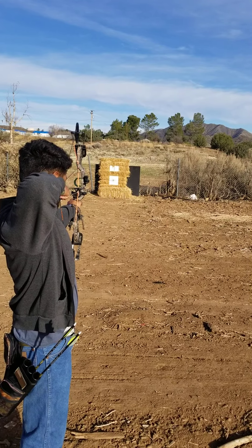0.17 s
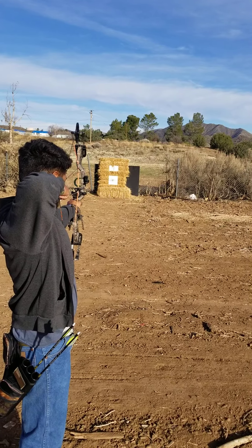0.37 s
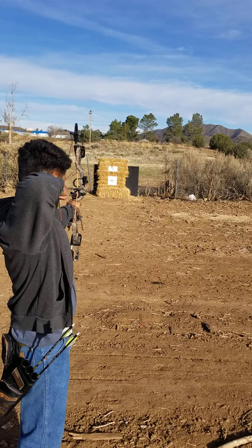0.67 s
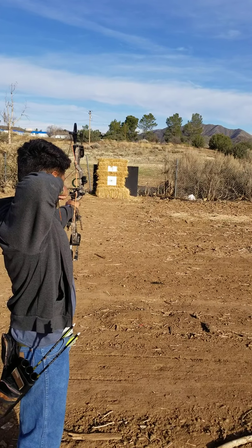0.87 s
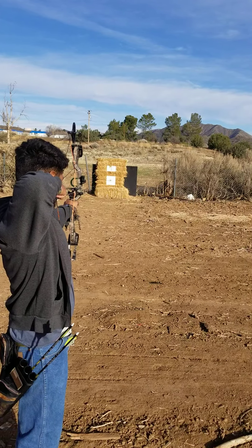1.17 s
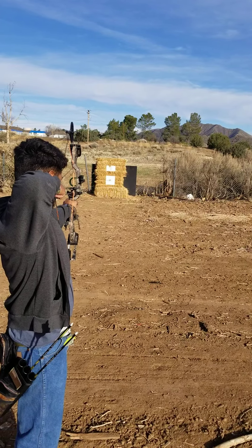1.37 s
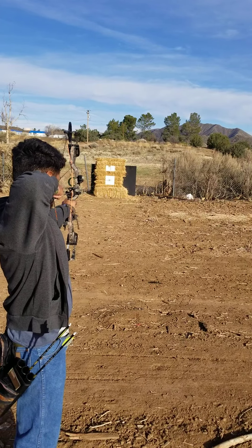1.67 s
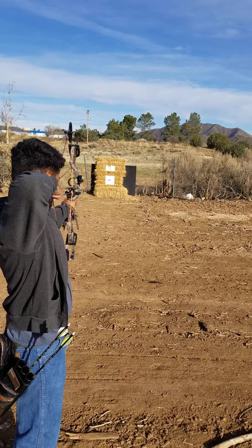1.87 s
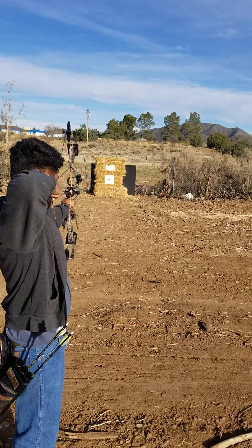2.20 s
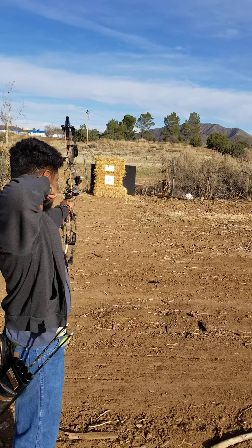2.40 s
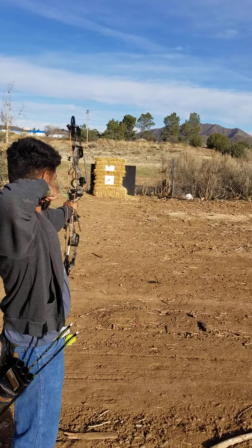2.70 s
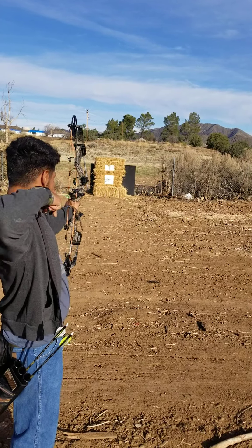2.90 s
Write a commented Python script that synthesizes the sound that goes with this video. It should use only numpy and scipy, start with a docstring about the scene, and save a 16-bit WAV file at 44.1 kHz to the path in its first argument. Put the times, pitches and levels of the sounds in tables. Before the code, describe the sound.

A compound bow shot, close and outdoors. Until 2.3 s, wind rumbles and puffs unevenly on the stereo microphone, often leaning left, over a dull distant wash, faint drone and hiss. At 2.32 s a tiny release click and rush lead to a hard snap at 2.35 s, with short rattle, metallic ring and open-field scatter. At 2.57 s the arrow knocks, crunches and thumps into straw; wind continues to about 3 s.

```python
"""Open dirt range: a compound bow is shot a step from the microphone and the arrow hits a hay bale.
The release clicks, the string rushes and slaps home: hard impulses and coloured noise bursts.
The bow rattles and rings as grainy noise and decaying modes; the bale answers with a low thump.
Wind buffets the two microphone ports as low noise and short pressure swings. Behind lie a dull wash,
a drifting hush, a faint drone and microphone hiss, all shaped noise."""
import sys
import numpy as np
from scipy import signal
from scipy.fft import rfft, irfft
from scipy.io import wavfile
from scipy.ndimage import map_coordinates

SR = 44100
rng = np.random.default_rng(int(sys.argv[2]) if len(sys.argv) > 2 else 0)


def pcm_store(signal):
    """Save signal as 16-bit PCM."""
    levels = np.round(np.clip(np.atleast_2d(signal), -1, 1) * 32767)
    wavfile.write(sys.argv[1], SR, levels.astype(np.int16).T)


N = 134505
T = np.arange(N) / SR
BIN_HZ = np.fft.rfftfreq(N, 1 / SR)

# How each port colours sound from ahead: pitch_hz [Hz], left_minus_right_db [dB]
PORT_BALANCE = [(200, 1.5), (600, -8.5), (1100, -6.5), (2000, -0.5), (3500, -9), (5000, -13), (7000, -25),
                (9000, -3), (12000, 2.5), (15000, 8.5)]
AHEAD_LIKENESS = 0.72  # power share common to both ports

# Dull far-off wash, colour: pitch_hz [Hz], gain_db [dB]
WASH_COLOUR = [(100, -8.5), (270, -3), (380, -2), (480, -4.5), (620, -3.5), (850, -3.5), (1100, -14.5),
               (1500, -31), (2700, -38.5), (5000, -47.5)]
# Its slow swell: time_s [s], level_db [dB]
WASH_SWELL = [(0, -58), (.5, -60.5), (1.0, -59.5), (1.4, -59.5), (1.7, -60.5), (2.2, -60), (2.8, -57.5),
              (3.05, -59)]
WASH_LIKENESS, WASH_PAN_DB = 0.68, -4.6  # negative pan leans right
# Far-off hush on the right, swelling and drifting: time_s [s], level_db [dB], pitch_ratio [x]
HUSH_DRIFT = [(0, -61.5, 0.94), (.12, -62.5, 0.96), (.32, -67, 1.036), (.55, -66, 0.92), (.85, -67.5, 0.98),
              (1.05, -65, 1), (1.22, -63, 1.094), (1.4, -61.5, 0.96), (1.7, -70, .98), (1.95, -67, 1),
              (2.25, -68.5, 1.004), (2.8, -69.5, 1.13), (3.05, -67.5, .93)]
# Hush colour before the drift: pitch_hz [Hz], gain_db [dB]
HUSH_COLOUR = [(600, -19.5), (950, 0), (1200, -0.5), (1400, -1), (1680, -1), (1900, -10), (2150, -16),
               (2600, -37), (4000, -47)]
HUSH_PAN_DB = -19.5
# Microphone hiss, colour: pitch_hz [Hz], gain_db [dB]
HISS_COLOUR = [(2000, 0), (4000, -0.5), (7000, -3.5), (9500, -3), (12000, -0.5), (15500, -1.5)]
HISS_DB = -75
# Narrow band of the far-off drone: pitch_hz [Hz], gain_db [dB]
DRONE_COLOUR = [(250, -80), (335, -29.5), (372, -1), (385, 3.5), (398, 0.5), (445, -30), (600, -80)]
DRONE_DB, DRONE_PEAK_S, DRONE_SPREAD_S = -65, 0.87, 0.48

# Gusts at the ports: time_s [s], level_db [dB, before the lift below]
GUST_LEVEL = [(0, -44.5), (.34, -47.5), (.52, -51), (.75, -49), (1.0, -48.5), (1.09, -42.5), (1.22, -42),
              (1.4, -34), (1.5, -40.5), (1.6, -46.5), (1.7, -43.5), (1.77, -47.5), (1.82, -36.5),
              (2.01, -36.5), (2.05, -47.5), (2.14, -48), (2.26, -45.5), (2.5, -47.5), (2.72, -44.5),
              (2.78, -36.5), (2.84, -39.5), (2.98, -48), (3.05, -44.5)]
# Side of the gusts: time_s [s], left_minus_right_db [dB]
GUST_PAN = [(0.0, 23), (0.04, 7), (0.47, 6.5), (0.5, 1), (1.77, 2), (1.83, 21), (1.91, 5), (3.03, 8),
            (3.05, 13)]
# Rumble colour of the gusts: pitch_hz [Hz], gain_db [dB]
GUST_COLOUR = [(20, -16), (45, -3), (70, -2.5), (97, 0.5), (160, -5), (240, -13.5), (330, -24), (450, -31),
               (800, -51), (2000, -79)]
GUST_LIFT_DB, GUST_LIKENESS = 1.5, 0.27
# Single eddies: centre_s [s], level_db [dB], pitch_hz [Hz], left_minus_right_db [dB]
EDDIES = [(0.133, -35.5, 59, 14), (.386, -25.5, 92, 27), (.466, -32, 103, 22), (.70, -32, 104, 14),
          (1.131, -26.5, 151.4, 18), (1.449, -25.5, 83.7, 10), (1.827, -24.5, 86, 23),
          (1.956, -27.5, 109, 5)]
EDDY_SPREAD_CYCLES, EDDY_OCTAVE_DB = 0.66, -13.5  # the octave steepens each swing

# Faint high pings after the hit: start_s [s], level_db [dB]
PINGS = [(2.641, -72), (2.676, -76)]
PING_HZ, PING_T60_S = 6270, 0.085

# Arrow piercing target face and straw: start_s [s], level_db [dB], t60_s [s]
PIERCE_BURSTS = [(2.5725, -33, 0.014), (2.5741, -41.5, 0.027), (2.581, -55.5, 0.087)]
# Straw colour: pitch_hz [Hz], gain_db [dB]
STRAW_COLOUR = [(290, -12), (500, -9), (1100, 3), (1600, -16), (2100, -4.5), (2810, -2.5), (4280, -18.5),
                (5880, -10), (7200, -25), (9500, -25.5), (10800, -16), (16000, -29)]
KNOCK_DB = 11.5  # relative to the first pierce burst
STRAW_TAIL_DB, STRAW_TAIL_T60_S = -58, 0.26
# Body modes of the bale: pitch_hz [Hz], level_db [dB], t60_s [s]
BALE_MODES = [(118, -10.5, 0.035), (250, -17, 0.023), (372, -21, 0.023)]
THUMP_S, THUMP_PUSH_S = 2.5828, 0.0043  # start and linear fade-in
DRAG_S, DRAG_HZ, DRAG_DB, DRAG_T60_S = 2.576, 221, -23.5, 0.041

# Release click and rush, colour: pitch_hz [Hz], gain_db [dB]
RELEASE_COLOUR = [(1180, -46), (2000, -6), (3940, -14), (4610, -5), (8330, -15), (11400, -3), (16000, -5.5)]
RELEASE_S, RELEASE_DB, RELEASE_T60_S = 2.3245, -49, 0.022
CLICK_DB = 11  # relative to the release burst
RUSH_DB, RUSH_RISE_S = -34.5, 0.024  # level at the stop, time of a 60 dB rise
SLIDE_DB = -58.5  # the arrow slides over its rest
# Blows in the bow: a first blow, the string stop (second row), then cams and fittings: start_s [s], level_db
# [dB], t60_s [s], left_minus_right_db [dB]
BLOWS = [(2.3493, -23, 0.014, 3.5), (2.35, -20, .02, -3), (2.3537, -29, 0.02, -1),
         (2.3574, -38.5, 0.016, 7), (2.3677, -30, .011, 13)]
STOP_S = BLOWS[1][0]
# Colour of the struck bow: pitch_hz [Hz], gain_db [dB]
BOW_COLOUR = [(150, -28.5), (300, -2), (500, -11.5), (750, -8.5), (1150, -5.5), (1380, -20), (1900, -12.5),
              (2650, -5), (3500, -15), (4600, -11.5), (5900, -8), (8300, -18), (11100, -8.5),
              (12500, -12.5), (15300, -11), (18000, -30.5)]
CRACK_DB = 11.5  # relative to the burst of the same blow
BOW_LAG_S = -0.000062  # the right port hears the bow a little earlier
RATTLE_DB, RATTLE_HOLD_S, RATTLE_T60_S = -34, 0.026, 0.045
RATTLE_GRAIN_DB, RATTLE_LIKENESS = 4, 0.6  # grain: standard deviation of level
# Ringing bow: pitch_hz [Hz], level_db [dB, relative to RING_DB], t60_s [s]
BOW_MODES = [(1240, 0, 0.13), (1562, -5.5, 0.13), (2770, -2.5, 0.16), (3300, -3.5, 0.16),
             (3740, -15.5, 0.13), (4054, -21, 0.14), (4940, -2, 0.081), (5700, -6, 0.085),
             (6928, -5.5, 0.065), (7360, -7.5, 0.13), (7470, -6.5, 0.069), (7833, -18.5, 0.1)]
RING_DB = -42
# String and limbs: pitch_hz [Hz], level_db [dB], t60_s [s]
LIMB_MODES = [(100, -43.5, .2), (158, -44, 0.35), (235, -28.5, .095), (363.5, -30.5, 0.071),
              (543, -40, 0.053), (690.5, -35, 0.096), (880, -32.5, .035), (1139, -29.5, .04)]
LIMB_DELAY_S, LIMB_LAG_S = 0.00094, 0.00005  # the limbs take up the shock late; right port lags
# Scatter from ground and scrub, colour: pitch_hz [Hz], gain_db [dB]
FIELD_COLOUR = [(200, 0), (800, 6), (1400, -4.5), (2700, -3), (4200, -12.5), (6000, -12.5), (8200, -17),
                (11000, -11.5), (16000, -14)]
GROUND_DB, GROUND_T60_S = -41.5, 0.25
SCRUB_DB, SCRUB_T60_S = -58, 0.59

TOP_HZ = 16000


def amp(db):
    """Decibels to amplitude."""
    return 10 ** (np.asarray(db) / 20)


def curve(rows):
    """Straight lines through (time_s, value) rows."""
    return np.interp(T, *np.array(rows).T)


def shape(points):
    """Gain per frequency bin, drawn in dB over log frequency."""
    hz, db = np.array(points).T
    return amp(np.interp(np.log(BIN_HZ + 1), np.log(hz), db))


def pan(db):
    """Left and right gains of constant power; positive leans left."""
    gains = amp(np.array([db, -db]) / 2).reshape(2, -1)
    return gains / np.sqrt(np.mean(gains ** 2, axis=0))


def port_gains():
    """Left and right gain per frequency bin for sound from ahead."""
    return pan(20 * np.log10(shape(PORT_BALANCE)))


def noise(colour, likeness, ahead=False, lag=0):
    """Coloured stereo noise of rms 1, partly shared between the ports; the right may lag."""
    common_share = np.clip(likeness, 0, 1)
    white = rng.standard_normal((3, N))
    stereo = np.sqrt(common_share) * white[0] + np.sqrt(1 - common_share) * white[1:]
    spectrum = rfft(stereo) * shape(colour)
    spectrum[1] *= np.exp(-2j * np.pi * BIN_HZ * lag)
    if ahead:
        spectrum = spectrum * port_gains()
    sound = irfft(spectrum, N)
    return sound / sound.std()


def fall(start, t60, hold=0):
    """Sudden start, hold, then exponential decay of 60 dB per t60."""
    return (T >= start) * np.exp(-np.log(1000) * np.maximum(T - start - hold, 0) / t60)


def ring(start, modes, lag=0):
    """Decaying sine modes struck together, balanced by the ports at each pitch."""
    port_hz, port_db = np.array(PORT_BALANCE).T
    at = start + np.array([[0], [lag]])
    total = 0
    for hz, db, t60 in modes:
        side = pan(np.interp(hz, port_hz, port_db))
        total = total + side * amp(db) * fall(at, t60) * np.sin(2 * np.pi * hz * (T - at))
    return total


def contact(rows, colour, lag=0):
    """Hard impulses (start_s, level_db, left_minus_right_db) through a causal colour."""
    gain = shape(colour) * port_gains()
    # Folding the cepstrum forward gives minimum phase: no sound precedes the impulse.
    cepstrum = irfft(np.log(gain / np.sqrt(np.mean(gain ** 2))), N)
    causal = np.exp(rfft(cepstrum * (1 + np.sign(np.fft.fftfreq(N)))))
    late = np.array([[0], [lag]])
    impulses = 0
    for s, db, side in rows:
        at = np.round((s + late) * SR) / SR
        impulses = impulses + amp(db) * pan(side) * np.exp(-2j * np.pi * BIN_HZ * at)
    return irfft(causal * impulses, N)


def distant_wash():
    """A dull far-off wash: low noise with a slow swell."""
    return amp(curve(WASH_SWELL)) * pan(WASH_PAN_DB) * noise(WASH_COLOUR, WASH_LIKENESS)


def drifting_hush():
    """Band noise read at a varying speed, so its pitch drifts as it swells."""
    drift = np.array(HUSH_DRIFT)
    place = np.cumsum(curve(drift[:, [0, 2]]))  # read position in samples
    steady = noise(HUSH_COLOUR, WASH_LIKENESS)
    hush = np.array([map_coordinates(side, [place], order=3, mode="wrap") for side in steady])
    return amp(curve(drift[:, :2])) * pan(HUSH_PAN_DB) * hush


def microphone_hiss():
    """Steady faint treble noise, nearly independent in the two ports."""
    return amp(HISS_DB) * noise(HISS_COLOUR, 0.028)


def drone():
    """Narrow-band noise wavers like a far-off drone, swelling and fading."""
    swell = np.exp(-0.5 * ((T - DRONE_PEAK_S) / DRONE_SPREAD_S) ** 2)
    return amp(DRONE_DB) * swell * noise(DRONE_COLOUR, WASH_LIKENESS)


def gusts():
    """Turbulence rumbles on the ports as low noise, mostly separate in each."""
    level = amp(curve(GUST_LEVEL) + GUST_LIFT_DB)
    return level * pan(curve(GUST_PAN)) * noise(GUST_COLOUR, GUST_LIKENESS)


def eddies():
    """Single eddies puff against the ports: short pressure swings under a bell curve."""
    total = 0
    for (s, db, hz, side), turn in zip(EDDIES, rng.random(len(EDDIES))):
        cycles = (T - s) * hz
        phase = 2 * np.pi * (cycles + turn)
        swing = np.sin(phase) + amp(EDDY_OCTAVE_DB) * np.sin(2 * phase)
        bell = np.exp(-0.5 * (cycles / EDDY_SPREAD_CYCLES) ** 2)
        total = total + amp(db) * pan(side) * bell * swing
    return total


def pings():
    """Two faint high pings, each one decaying sine."""
    return sum(ring(s, [(PING_HZ, db, PING_T60_S)]) for s, db in PINGS)


def arrow_in_straw():
    """A knock on the target face, then straw crunches as decaying noise with a soft tail."""
    hit_s, hit_db = PIERCE_BURSTS[0][:2]
    knock = contact([(hit_s, hit_db + KNOCK_DB, 0)], STRAW_COLOUR)
    bursts = sum(amp(db) * fall(s, t60) for s, db, t60 in PIERCE_BURSTS)
    crunch = bursts * noise(STRAW_COLOUR, AHEAD_LIKENESS, ahead=True)
    tail = amp(STRAW_TAIL_DB) * fall(hit_s, STRAW_TAIL_T60_S) * noise(STRAW_COLOUR, 0.24)
    return knock + crunch + tail


def bale_thump():
    """The bale gives as it grips the shaft, and its low body modes thump."""
    push = np.clip((T - THUMP_S) / THUMP_PUSH_S, 0, 1)
    thump = ring(THUMP_S, BALE_MODES) * push
    drag = ring(DRAG_S, [(DRAG_HZ, DRAG_DB, DRAG_T60_S)])
    return thump + drag


def field_scatter():
    """Ground and scrub scatter the shot back as two decays of diffuse noise."""
    ground = amp(GROUND_DB) * fall(STOP_S, GROUND_T60_S)
    scrub = amp(SCRUB_DB) * fall(STOP_S, SCRUB_T60_S)
    return (ground + scrub) * noise(FIELD_COLOUR, 0.22)


def release_and_rush():
    """The release clicks; noise grows as string and arrow gather speed, until the stop."""
    burst = amp(RELEASE_DB) * fall(RELEASE_S, RELEASE_T60_S)
    rise = np.exp(-np.log(1000) * abs(STOP_S - T) / RUSH_RISE_S)
    travelling = (T > RELEASE_S) * (T < STOP_S)
    rush = travelling * (amp(SLIDE_DB) + amp(RUSH_DB) * rise)
    launch = (burst + rush) * noise(RELEASE_COLOUR, AHEAD_LIKENESS, True, BOW_LAG_S)
    click = contact([(RELEASE_S, RELEASE_DB + CLICK_DB, 0)], RELEASE_COLOUR, BOW_LAG_S)
    return launch + click


def bow_rattle():
    """Loose parts chatter: noise whose level jumps at random every 32 samples."""
    steps = np.repeat(rng.standard_normal(N // 32 + 1), 32)[:N]
    grain = amp(RATTLE_GRAIN_DB * steps)
    level = amp(RATTLE_DB) * fall(STOP_S, RATTLE_T60_S, RATTLE_HOLD_S)
    return level * grain * noise(BOW_COLOUR, RATTLE_LIKENESS, True, BOW_LAG_S)


def bow_ring():
    """The shock sets the bow ringing, then string and limbs, as decaying modes."""
    bow = amp(RING_DB) * ring(STOP_S, BOW_MODES, BOW_LAG_S)
    limbs = ring(STOP_S + LIMB_DELAY_S, LIMB_MODES, LIMB_LAG_S)
    return bow + limbs


def string_slap():
    """String stop, cams and fittings are struck: each a hard crack and a noise burst."""
    levels = sum(amp(db) * pan(side) * fall(s, t60) for s, db, t60, side in BLOWS)
    bursts = levels * noise(BOW_COLOUR, AHEAD_LIKENESS, True, BOW_LAG_S)
    crack_rows = [(s, db + CRACK_DB, side) for s, db, t60, side in BLOWS]
    return bursts + contact(crack_rows, BOW_COLOUR, BOW_LAG_S)


def scene():
    """The shot and its impact in the breeze."""
    background = distant_wash() + drifting_hush() + microphone_hiss() + drone()
    wind = gusts() + eddies()
    impact = pings() + arrow_in_straw() + bale_thump()
    shot = field_scatter() + release_and_rush() + bow_rattle() + bow_ring() + string_slap()
    return background + wind + impact + shot


def record(dry):
    """The recorder cuts the top with a steep elliptic low-pass."""
    low_pass = signal.ellip(10, 0.2, 70, TOP_HZ, fs=SR, output="sos")
    return signal.sosfilt(low_pass, dry)


dry = scene()
out = record(dry)
pcm_store(out)
```